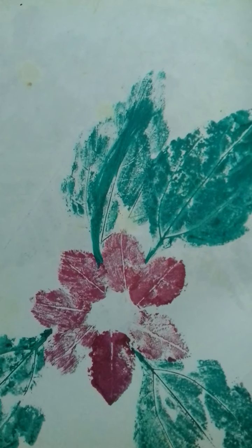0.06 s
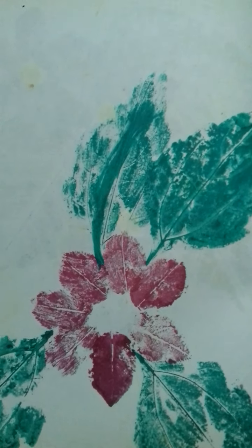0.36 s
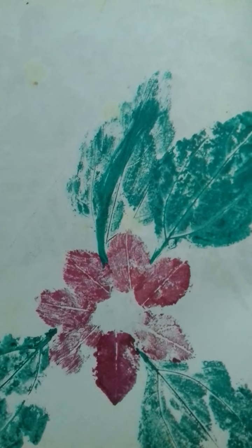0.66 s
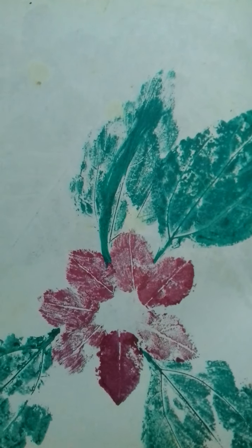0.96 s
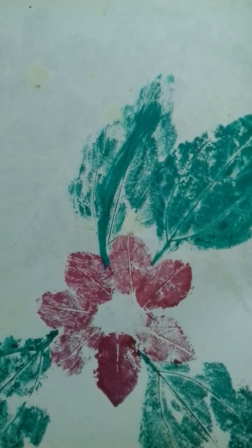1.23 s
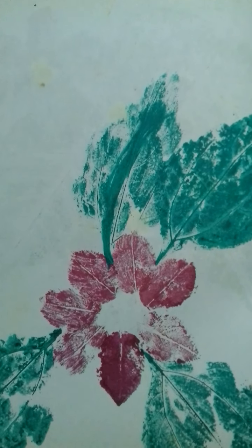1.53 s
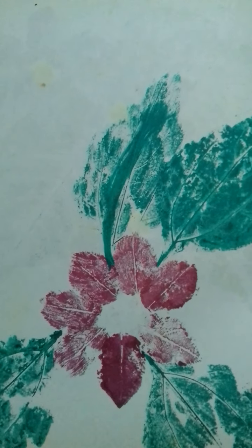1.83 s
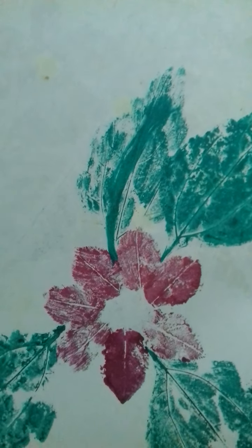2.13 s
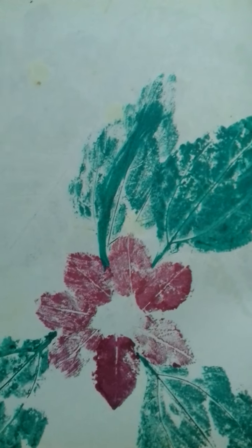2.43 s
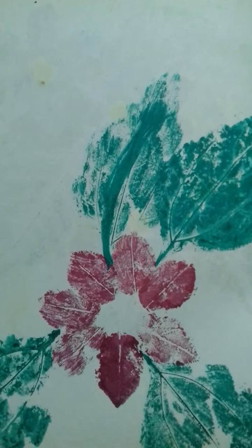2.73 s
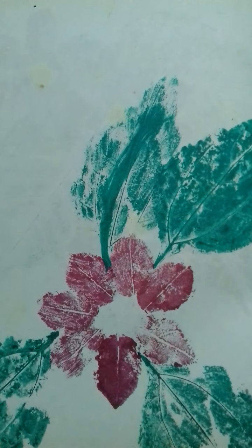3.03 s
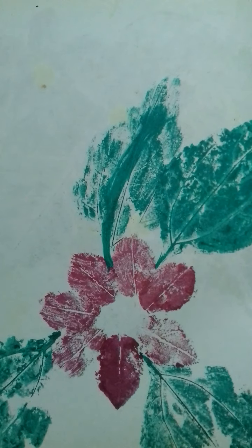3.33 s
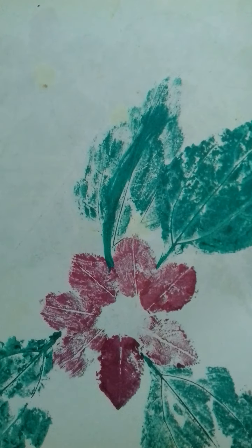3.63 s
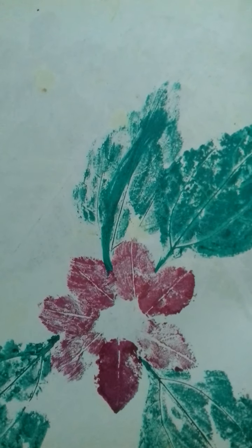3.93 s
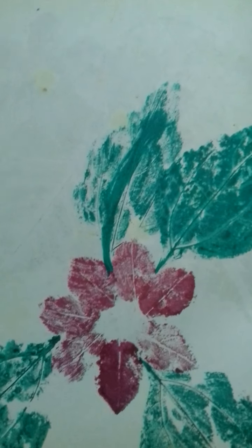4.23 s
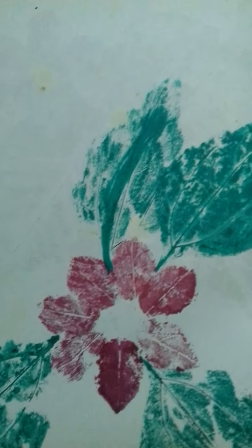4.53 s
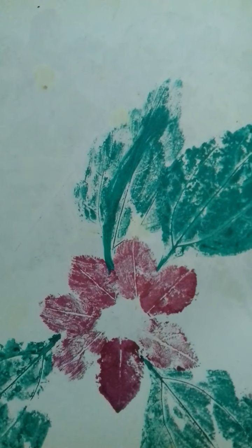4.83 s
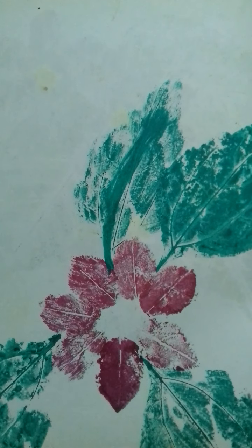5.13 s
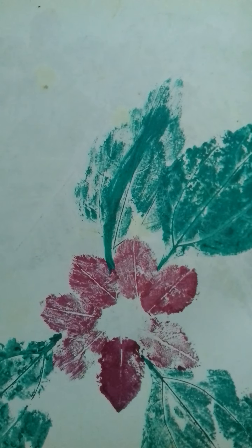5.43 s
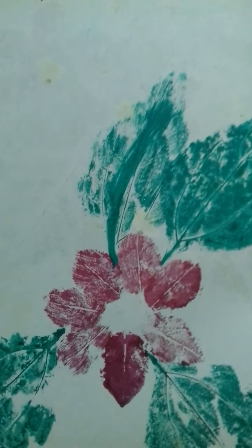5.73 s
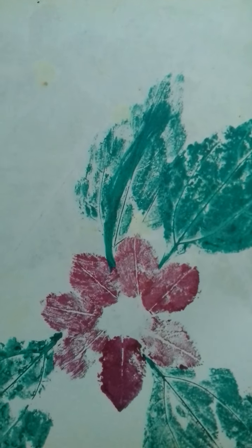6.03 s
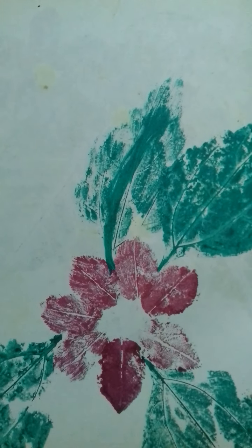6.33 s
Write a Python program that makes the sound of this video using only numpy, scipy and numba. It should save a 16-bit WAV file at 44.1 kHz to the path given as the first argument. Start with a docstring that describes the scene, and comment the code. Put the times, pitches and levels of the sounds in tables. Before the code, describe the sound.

Paper slides and crinkles close by in short, irregular spells, with light clicks and one sharper snap, in a quiet room.

```python
"""Paper shifted by hand.

A quiet room, sheets of paper close in front of a phone's microphone. Sliding fibres catch and slip in
dense tiny clicks; now and then the sheet buckles or an edge flicks down with a snap. Both ring the same
papery resonances. A dragging fingertip makes the sheet groan, and the hardest snap puffs the air.
In the background a faint hoot passes once over the room's hush."""
import sys
import numpy as np
from scipy import signal
from scipy.fft import rfft, irfft
from scipy.io import wavfile
from numba import njit

SR = 44100
rng = np.random.default_rng(int(sys.argv[2]) if len(sys.argv) > 2 else 0)


def master_out(mix):
    """Clip the mix to full scale and print it as 16-bit PCM to the path in sys.argv[1]."""
    frames = np.transpose(np.atleast_2d(mix))
    ceiling = np.clip(frames, -1, 1)
    pcm = np.round(ceiling * 32767).astype(np.int16)
    wavfile.write(sys.argv[1], SR, pcm)


N = 285311


def undb(db):
    """Decibels to gain."""
    return 10 ** (np.asarray(db) / 20)


def unit(x):
    """Scale to rms 1."""
    return x / np.sqrt(np.mean(x ** 2) + 1e-30)


def colour(x, points, size=4096):
    """Minimum-phase filter through (frequency [Hz], gain [dB]) points, so that attacks stay sharp."""
    hz, db = np.transpose(points)
    bins_hz = np.maximum(np.fft.rfftfreq(size, 1 / SR), 1)
    gain = undb(np.interp(np.log(bins_hz), np.log(hz), db))
    cepstrum = irfft(np.log(gain))
    cepstrum[1:size // 2] *= 2
    cepstrum[size // 2 + 1:] = 0
    response = irfft(np.exp(rfft(cepstrum)))
    return signal.fftconvolve(x, response)[:len(x)]


def band(x, edges_hz, kind, order):
    """Butterworth filter."""
    return signal.sosfilt(signal.butter(order, edges_hz, kind, fs=SR, output="sos"), x)


def ring(x, hz, q):
    """One resonance, gain 1 at its centre."""
    return signal.lfilter(*signal.iirpeak(min(hz, SR / 3), max(q, hz / SR * np.pi), fs=SR), x)


@njit
def moving_ring(x, hz, q):
    """State-variable resonance whose centre may move every sample."""
    y, band_state, low_state = np.empty(len(x)), 0., 0.
    for i in range(len(x)):
        g = np.tan(np.pi * hz[i] / SR)
        passed = (band_state + g * (x[i] - low_state)) / (1 + g * (g + 1 / q))
        band_state = 2 * passed - band_state
        low_state += 2 * g * passed
        y[i] = passed / q
    return y


def rough_tone(hz, q):
    """Noise rung twice through a steady or gliding resonance: a wavering tone at rms 1."""
    resonate = ring if np.isscalar(hz) else moving_ring
    once = resonate(rng.standard_normal(N), hz, q)
    return unit(resonate(once, hz, q))


def wander(rate_hz):
    """Random drift with a spread near 1."""
    steps = np.arange(N) / SR * rate_hz
    return np.interp(steps, np.arange(N), rng.standard_normal(N))


# Spectrum of the quiet room at the microphone: (frequency [Hz], relative density [dB])
HUSH_SPECTRUM = [(25, -14), (55, -15), (140, -7), (260, -9), (450, -7.5), (750, -4), (1400, -7),
                 (2800, -10), (3700, -11), (5400, -16.5), (7000, -20), (15500, -22)]
# Stereo width of that hush: (frequency [Hz], side minus mid [dB])
HUSH_SIDE_GAIN = [(100, -11), (1000, -3.5), (4000, -2.5), (10000, 1.5)]


def hush(level_db=-67.5, drone_hz=132, drone_db=-91):
    """Steady room noise all around and microphone hiss, with a weak low drone in the centre."""
    mid, side = (unit(colour(rng.standard_normal(N), HUSH_SPECTRUM)) for _ in range(2))
    side = colour(side, HUSH_SIDE_GAIN)
    stereo = np.array([mid + side, mid - side])
    return undb(level_db) * stereo + undb(drone_db) * rough_tone(drone_hz, q=12.0)


def reflections(x, wet_db, t60_s):
    """The desk, phone and hand close by answer with dense, slightly dull echoes, from 3 ms behind the direct
    sound."""
    t = np.arange(SR // 2) / SR
    tail = band(rng.standard_normal(len(t)), 8900, "lowpass", order=1)
    tail *= undb(-60 * t / t60_s) * (t > .003)
    return undb(wet_db) * signal.fftconvolve(x, tail / np.linalg.norm(tail))[:N]


def hoot(start_s=4.08, level_db=-68.5, hz=590, rise_hz_per_s=150, overtone_hz=1300, overtone_db=-7):
    """A rough, hollow tone with a thin overtone barely clears the hush: it swells, rises and fades."""
    age = np.arange(N) / SR - start_s
    tone = rough_tone(hz + rise_hz_per_s * np.clip(age, 0, 1), q=6.2)
    overtone = undb(overtone_db) * rough_tone(overtone_hz, q=62.0)
    swell = np.interp(age, [0, .07, .19, .38], [0, 1, 1, 0])
    return undb(level_db) * swell * (tone + overtone)


def air_puff(start_s=2.484, level_db=-56, band_hz=(100, 400), attack_s=0.0016, decay_s=0.013):
    """The hardest snap shoves air at the microphone: a soft, low puff, dead within a few cycles."""
    age = np.arange(N) / SR - start_s
    puff = unit(band(rng.standard_normal(N), band_hz, "bandpass", order=2))
    envelope = np.clip(age / attack_s, 0, 1) * np.exp(-np.abs(age) / decay_s)
    return undb(level_db) * puff * envelope


# A fingertip dragged over the sheet:
# (time [s], length [s], start pitch [Hz], end pitch [Hz], level [dB])
FINGER_DRAGS = [(4.91, 0.14, 900, 947, -64.5), (5.591, 0.043, 1920, 1580, -49.5)]


def fingertip_groans():
    """Quick stick and slip under a fingertip rings one narrow resonance, gliding as the finger moves."""
    t = np.arange(N) / SR
    groans = np.zeros(N)
    for start, length, from_hz, to_hz, db in FINGER_DRAGS:
        progress = np.clip((t - start) / length, 0, 1)
        hz = from_hz + (to_hz - from_hz) * progress
        swell = np.sqrt(np.abs(np.sin(np.pi * progress)))
        groans += undb(db) * rough_tone(hz, q=14.0) * swell
    return groans


# The sheet's resonances, heard from close by: (frequency [Hz], gain [dB])
PAPER_SPECTRUM = [(100, -26.5), (200, -21.5), (400, -11), (580, -10), (1000, -2), (1950, -4.5), (2600, 0.5),
                  (3200, -1), (3850, -7.5), (4600, -6.5), (5900, -8.5), (7000, -17.5), (8300, -25),
                  (12000, -25.5), (15500, -31.5)]


def ring_paper(force):
    """Slips and snaps alike ring the sheet and take on its papery colour."""
    return colour(force, PAPER_SPECTRUM)


def fibre_slips(per_s, spread_db, rub_db):
    """Fibres let go at random moments, mostly small and a few larger, over a smooth rub."""
    sizes = undb(spread_db * np.minimum(rng.exponential(size=N), 2 * np.e))
    clicks = (rng.random(N) < per_s / SR) * sizes * rng.choice([-1, 1], N)
    rub = undb(rub_db) * rng.standard_normal(N)
    return unit(unit(clicks) + rub)


# Pushes of the hand that slide the sheet past the microphone:
# (time [s], length [s], friction level [dB], swell [dB], body re friction [dB], edge re friction [dB])
HAND_PUSHES = [(-0.01, 0.15, -52.5, -3, -7.5, -5), (0.109, .09, -47.5, -1, -11.5, -5),
               (0.298, .1, -65, 2, -3, 0.5), (0.504, 0.19, -61, 5, -11, -8),
               (0.777, 0.07, -58.5, 1, -11.5, -13), (0.887, 0.059, -48.5, -3.5, -10, -8),
               (0.955, .25, -52.5, -4, -11.5, -2.5), (1.245, 0.1, -63.5, -1, -13, -5),
               (1.354, 0.19, -61.5, 6, -12, -6), (1.58, 0.14, -60.5, -5, -6.5, -7.5),
               (1.717, 0.16, -59.5, -2, -7, -8.5), (1.935, 0.08, -65.5, 3, -19, -7.5),
               (2.197, 0.15, -67.5, 0.5, -2, -9), (2.265, 0.077, -65, 18, -11.5, -6.5),
               (2.329, 0.036, -48.5, 0.5, -20, -5), (2.376, 0.095, -52, 8, -14, -8),
               (2.501, 0.11, -36.5, -9.5, -12, -9.5), (2.622, 0.27, -49.5, -2, -9.5, -2.5),
               (3.409, 0.04, -64.5, 3, -2.5, -10.5), (3.483, 0.2, -71.5, 7, -2.5, -21),
               (3.614, 0.44, -68.5, 6.5, -5.5, -6), (4.134, 0.085, -67.5, 6, -6, -8),
               (4.31, 0.17, -74, 11.5, -1.5, -10.5), (4.523, 0.086, -58.5, 11.5, -11, -7),
               (4.666, 0.052, -60, 12, -15.5, -10), (4.755, 0.14, -42.5, -2, -11.5, -6),
               (4.917, .18, -54.5, 2, -5, 0), (5.15, 0.14, -67, 4.5, -6.5, -2.5),
               (5.313, 0.031, -47, 0.5, -8.5, -16), (5.352, .13, -49, 3, -2.5, -5),
               (5.514, 0.1, -50.5, -1, -2, -5.5), (5.638, 0.18, -70, 5, 10.5, -0.5),
               (5.773, 0.036, -46.5, 11, -7.5, -19.5), (5.854, 0.083, -52, -2.5, -1.5, -15),
               (5.906, 0.13, -52.5, -2.5, -6, -7), (6.128, 0.15, -76, 10.5, -4.5, -14)]


def friction(attack_s=0.019, coast_db_per_s=164.5):
    """Gains of bend, body and edge: each push starts quickly, swells or sags, then coasts to rest."""
    t = np.arange(N) / SR
    power = np.zeros((3, N))
    for start, length, db, swell_db, body_db, edge_db in HAND_PUSHES:
        age = t - start
        held_db = db + swell_db * np.clip(age / length, 0, 1)
        coast_db = coast_db_per_s * np.maximum(age - length, 0)
        push = np.clip(age / attack_s, 0, 1) * undb(held_db - coast_db)
        power += np.outer(undb([0, body_db, edge_db]), push) ** 2
    return np.sqrt(power)


# The bent sheet, ringing higher when taut: (time [s], bend resonance [Hz], edge resonance [Hz])
SHEET_RESONANCES = [(0, 2700, 4200), (.37, 2820, 5300), (.6, 2580, 4940), (.92, 2710, 4800),
                    (1.0, 2860, 5460), (1.22, 2920, 5900), (1.42, 2780, 4530), (1.56, 2770, 4600),
                    (1.76, 2920, 5500), (2.35, 3150, 6360), (2.52, 3220, 4280), (2.64, 3230, 4150),
                    (2.77, 2910, 4820), (4.85, 2970, 5200), (5.5, 2870, 5040), (5.85, 2850, 3900),
                    (6.05, 2770, 5330)]


def sliding(bend_trim_db=-3.0, edge_ring_db=-11.5, patchy_db=2.5, flutter_db=0.83):
    """Slips ring the sliding sheet: its slack body low, its bent part near 3 kHz, its edge above."""
    bend_gain, body_gain, edge_gain = friction()
    times, *resonances = np.transpose(SHEET_RESONANCES)
    bend_hz, edge_hz = (np.interp(np.arange(N) / SR, times, hz) for hz in resonances)
    coarse = ring_paper(fibre_slips(per_s=420, spread_db=1.0, rub_db=4.5))
    fine = ring_paper(fibre_slips(per_s=1800, spread_db=1.5, rub_db=-3.0))
    body = band(coarse, 1940, "lowpass", order=5)
    crisp = band(fine + coarse, [1650, 3900], "bandpass", order=4)
    bend = unit(crisp) + unit(moving_ring(crisp, bend_hz, q=3.64))
    scrape = band(fine, 2420, "highpass", order=6)
    edge = unit(scrape) + undb(edge_ring_db) * unit(moving_ring(scrape, edge_hz, q=3.3))
    parts = ((body, body_gain), (bend, bend_gain * undb(bend_trim_db)), (edge, edge_gain))
    # the grip never holds evenly: each part wavers, and the whole flutters faster
    rustle = sum(unit(part) * gain * undb(patchy_db * wander(rate_hz=35)) for part, gain in parts)
    return rustle * undb(flutter_db * wander(rate_hz=110))


# Buckles and edge flicks close to the microphone:
# (time [s], level with the energy spread over 10 ms [dB], ring centre [Hz], crumple decay [ms])
BUCKLES_AND_FLICKS = [(0.042, -54, 2500, 0.75), (0.108, -50, 3560, 0.87), (0.115, -35, 1920, 2.3),
                      (0.405, -57.5, 1210, 6.1), (0.683, -51.5, 1790, 6.4), (0.695, -51.5, 730, 1.8),
                      (0.773, -55, 1830, 8), (0.891, -55, 2300, 3), (1.551, -50, 1900, 18),
                      (2.180, -48.5, 2900, 4.8), (2.182, -52, 850, 2.5), (2.239, -60.5, 4900, 1.2),
                      (2.422, -54, 1900, 2.3), (2.435, -55, 596, 3.5), (2.484, -36, 7500, 2.4),
                      (2.4862, -25, 2760, 13), (2.4877, -25.5, 2200, 3.4), (2.507, -42, 3900, 2.6),
                      (2.528, -45, 3300, 2.5), (2.557, -44, 3750, 2.3), (2.643, -49.5, 1490, 2.8),
                      (2.668, -49, 2210, 4.3), (3.985, -58.5, 5850, 9.5), (4.388, -51.5, 1300, 11),
                      (4.565, -50.5, 3460, 5.7), (4.604, -47.5, 2510, 8.7), (4.617, -53, 2700, 4.2),
                      (4.774, -39.5, 3540, 1.7), (4.778, -37, 1900, 2.8), (4.783, -41.5, 1050, 3.7),
                      (4.803, -47, 3300, 2.5), (4.834, -43.5, 2680, 2.9), (4.874, -44, 5800, 2.9),
                      (4.893, -39.5, 5100, 1.8), (4.893, -37.5, 990, 8), (5.045, -41.5, 1280, 9.9),
                      (5.3186, -30.5, 1630, 1.46), (5.347, -55, 2880, 0.91), (5.435, -44, 1300, 4.3),
                      (5.449, -39, 1260, 8), (5.496, -40.5, 1060, 5.8), (5.513, -52, 3080, 1.8),
                      (5.595, -43.5, 1900, 5.1), (5.626, -52, 1820, 2.9), (5.689, -51.5, 844, 2.4),
                      (5.749, -47, 1050, 11), (5.765, -45.5, 940, 17), (5.777, -50, 2010, 1.5),
                      (5.788, -41.5, 2980, 19), (5.812, -33.5, 1240, 12), (5.835, -46.5, 990, 3.2)]


def snapping(crumple_db=-10, shiver_db=-35, shiver_s=0.018, slack_db=-12, broad_db=-15):
    """A crease gives way in one push and a short run of smaller ones; the sheet shivers on."""
    snaps = np.zeros(N + SR)
    t = np.arange(SR // 8) / SR
    impulse = t == 0
    for time_s, db, hz, crumple_ms in BUCKLES_AND_FLICKS:
        crumple = undb(crumple_db) * rng.standard_normal(len(t)) * np.exp(-t * 1000 / crumple_ms)
        shiver = undb(shiver_db) * rng.standard_normal(len(t)) * np.exp(-t / shiver_s)
        # a large, low fold gives way softly and has little treble
        push = band(impulse + crumple + shiver, min(1.97 * hz, .4 * SR), "lowpass", order=2)
        # a fold barely radiates waves longer than itself; the slack sheet around it adds a little bass
        lowest_hz = min(0.45 * hz, 820)
        fold = band(push, lowest_hz, "highpass", order=6)
        slack = undb(slack_db) * band(push, lowest_hz, "lowpass", order=2)
        radiated = fold + slack
        snap = ring_paper(ring(radiated, hz, q=0.99) + undb(broad_db) * radiated)
        snap *= np.sqrt(0.01 * SR / np.sum(snap ** 2))
        start = int(time_s * SR)
        snaps[start:start + len(t)] += undb(db) * snap
    return snaps[:N]


def scene():
    """The paper is close and straight ahead. It, the hoot and the echoes are centred; the hush is wide."""
    direct = sliding() + snapping() + fingertip_groans() + air_puff() + hoot()
    return direct + reflections(direct, wet_db=-15.5, t60_s=0.1) + hush()


def record(dry, top_hz=15750):
    """The phone cuts the highest treble steeply."""
    return signal.sosfilt(signal.ellip(10, .2, 70, top_hz, fs=SR, output="sos"), dry)


dry = scene()
out = record(dry)
master_out(out)
```